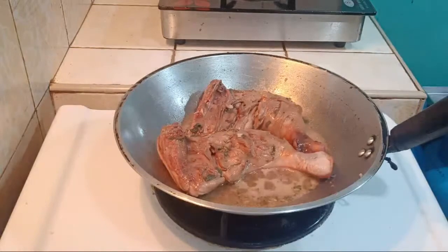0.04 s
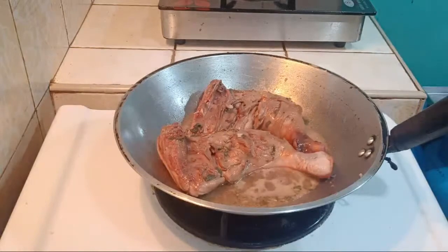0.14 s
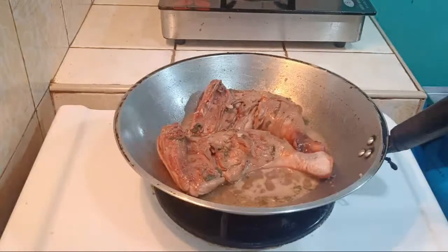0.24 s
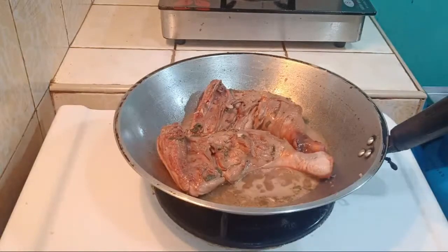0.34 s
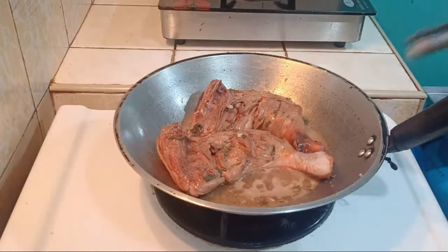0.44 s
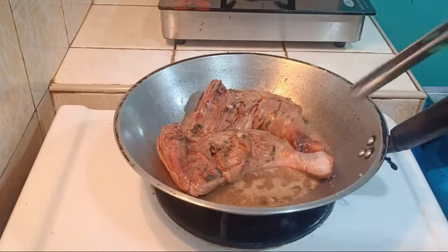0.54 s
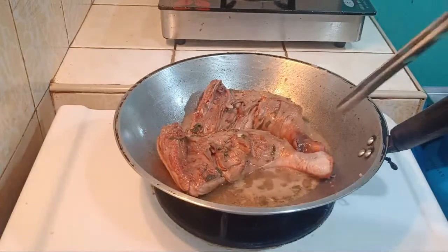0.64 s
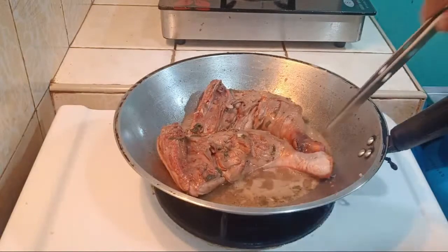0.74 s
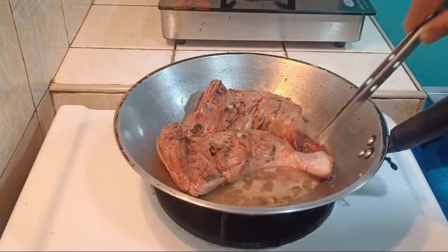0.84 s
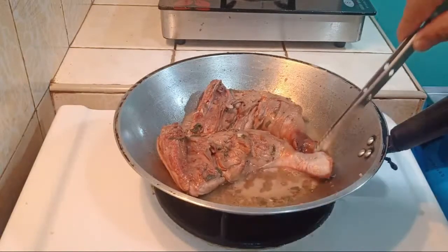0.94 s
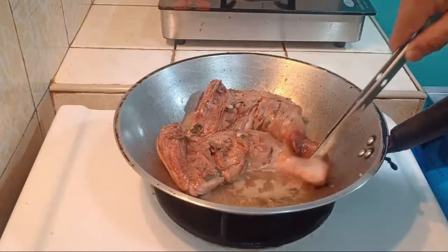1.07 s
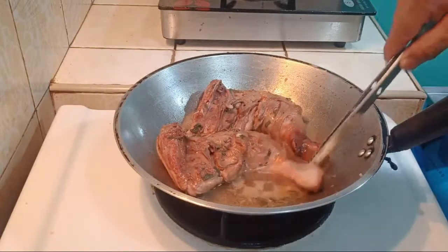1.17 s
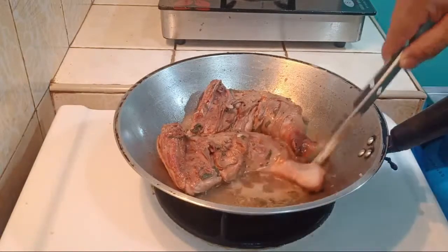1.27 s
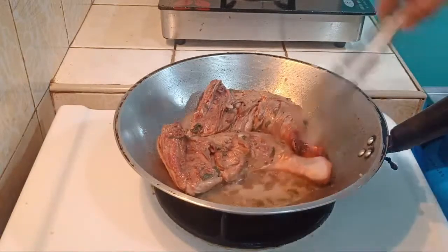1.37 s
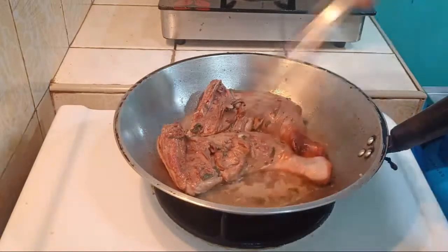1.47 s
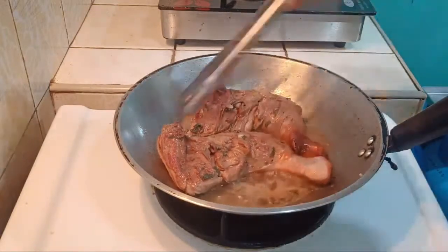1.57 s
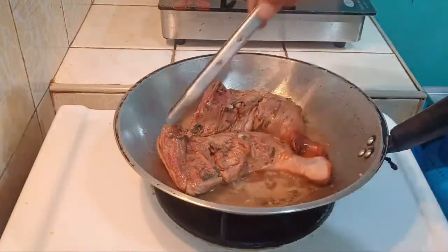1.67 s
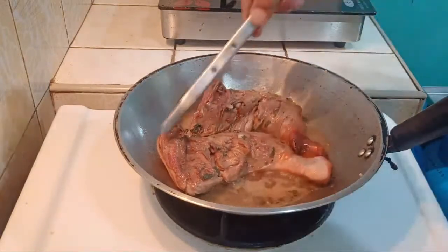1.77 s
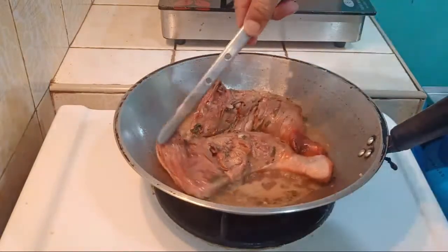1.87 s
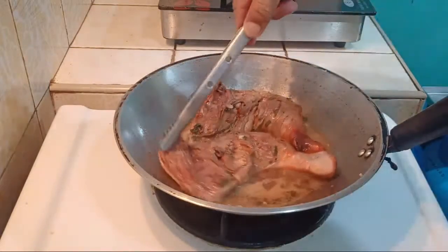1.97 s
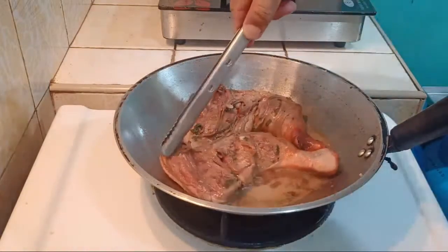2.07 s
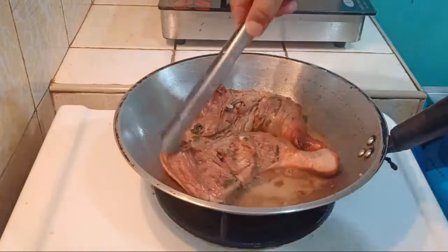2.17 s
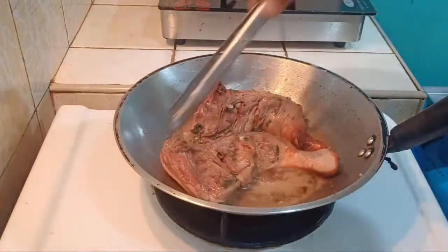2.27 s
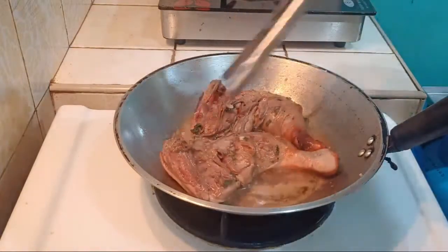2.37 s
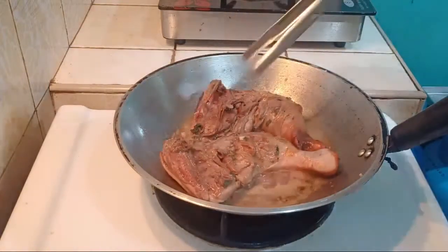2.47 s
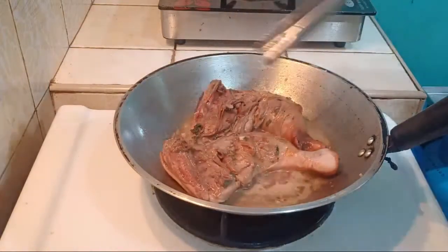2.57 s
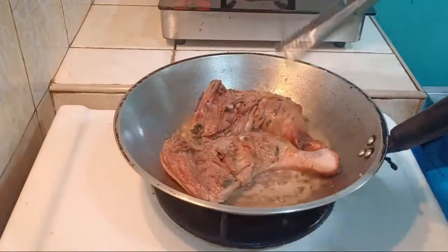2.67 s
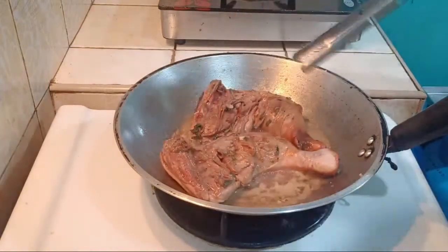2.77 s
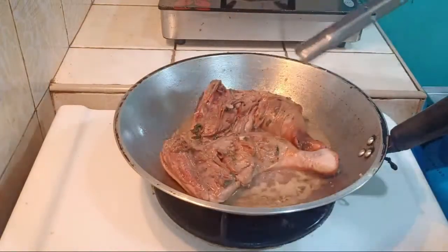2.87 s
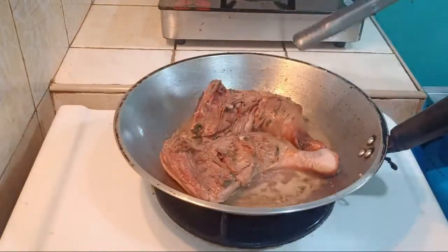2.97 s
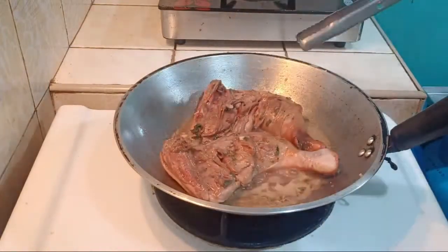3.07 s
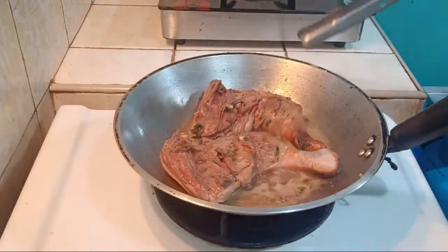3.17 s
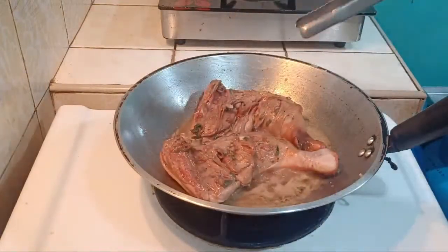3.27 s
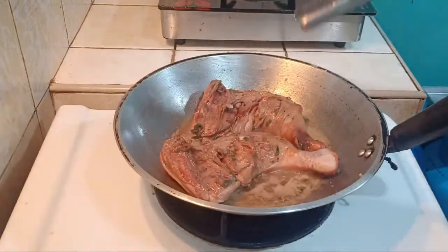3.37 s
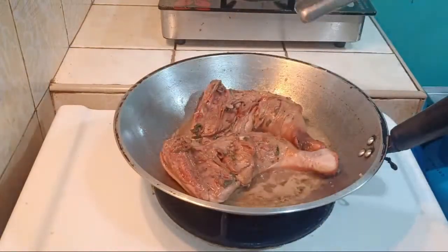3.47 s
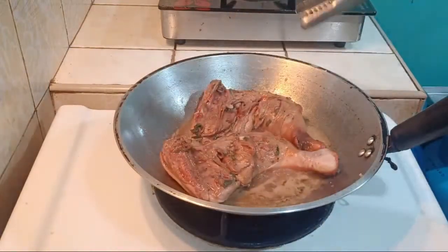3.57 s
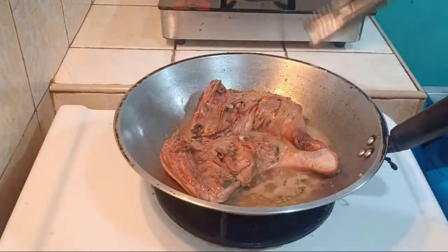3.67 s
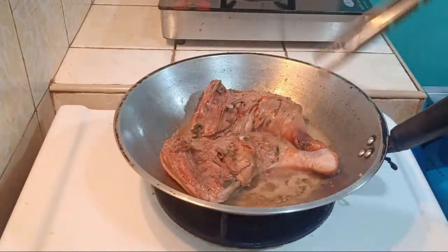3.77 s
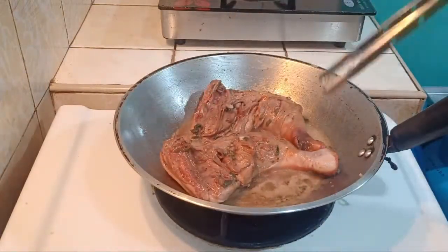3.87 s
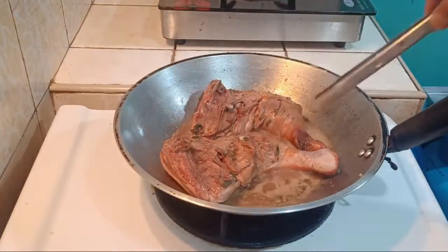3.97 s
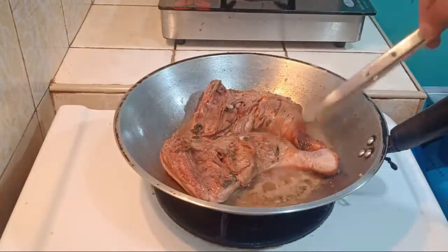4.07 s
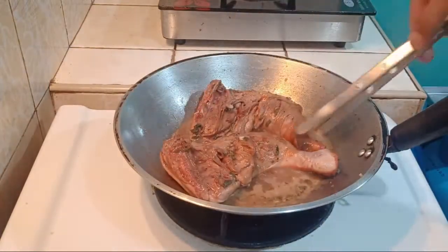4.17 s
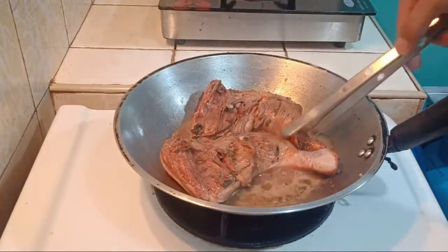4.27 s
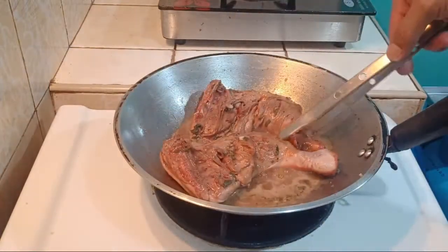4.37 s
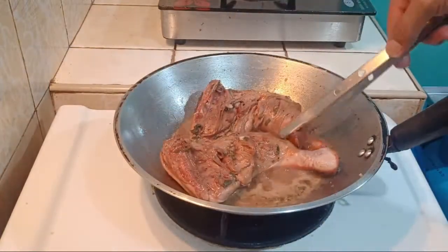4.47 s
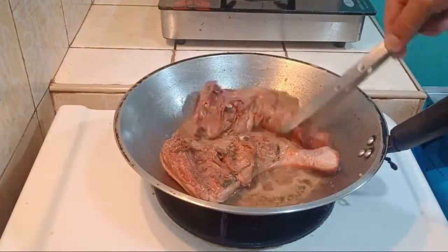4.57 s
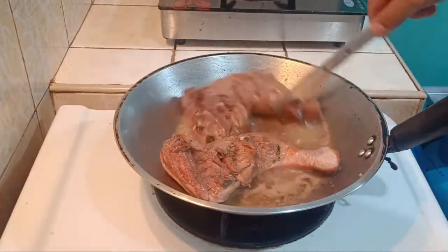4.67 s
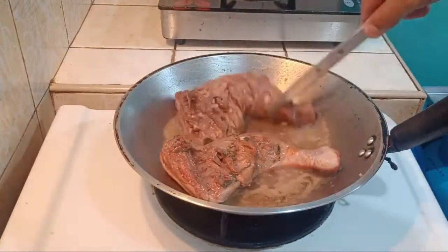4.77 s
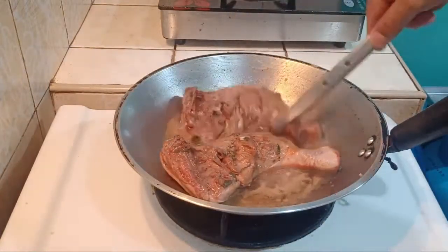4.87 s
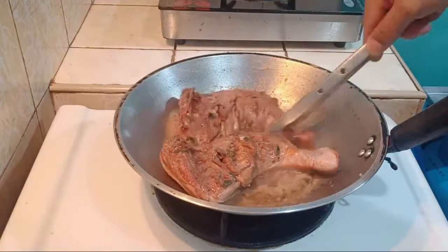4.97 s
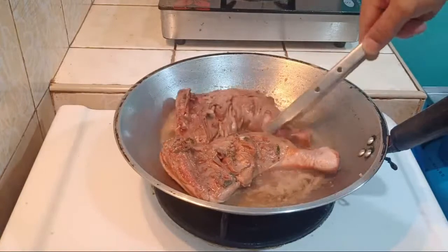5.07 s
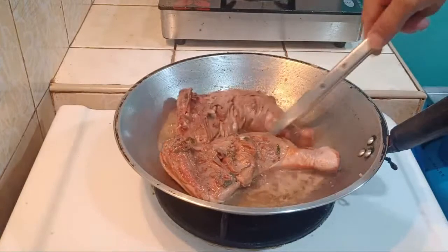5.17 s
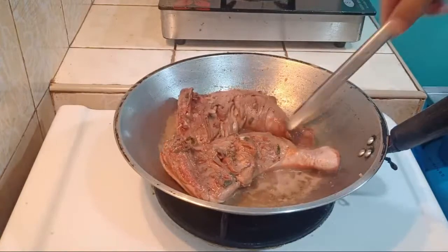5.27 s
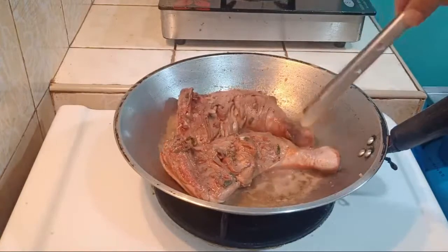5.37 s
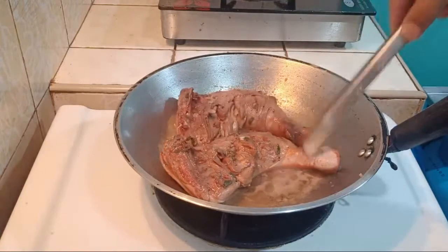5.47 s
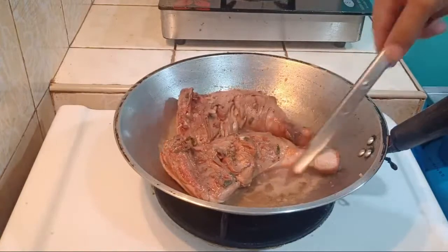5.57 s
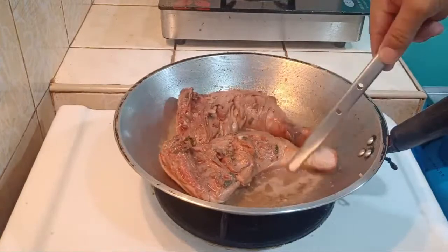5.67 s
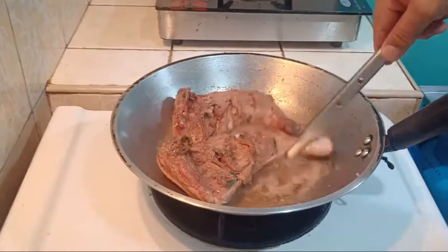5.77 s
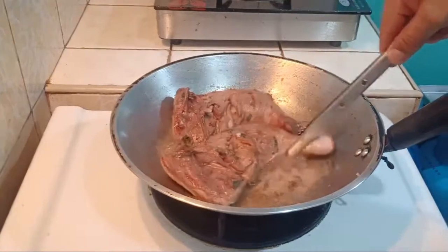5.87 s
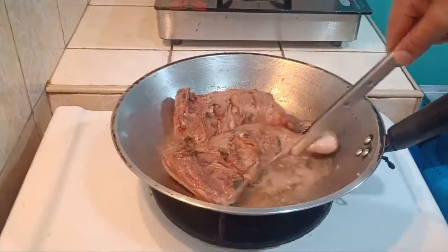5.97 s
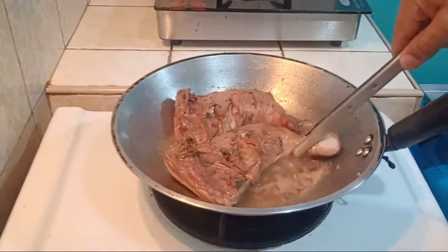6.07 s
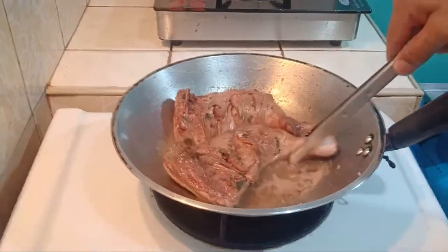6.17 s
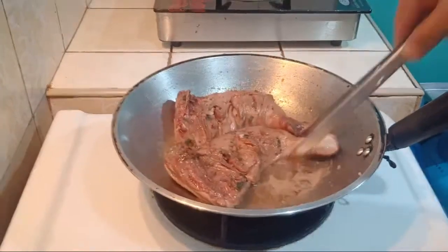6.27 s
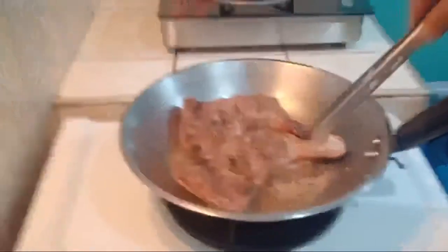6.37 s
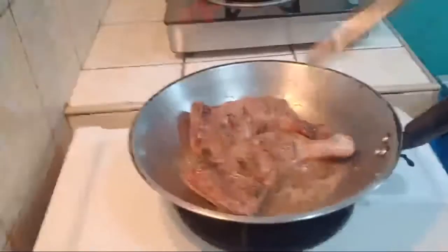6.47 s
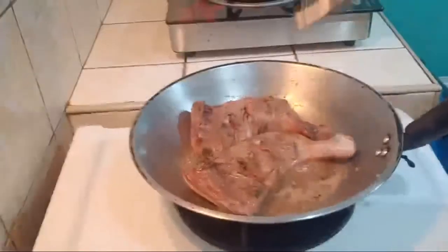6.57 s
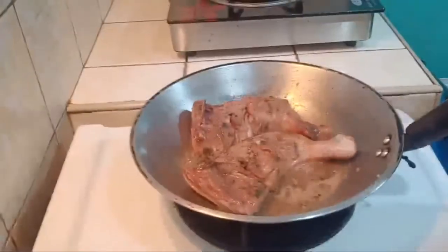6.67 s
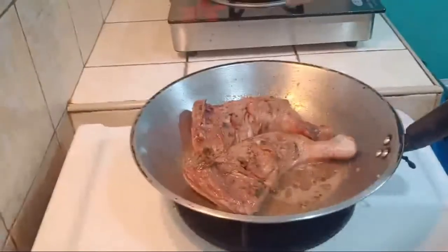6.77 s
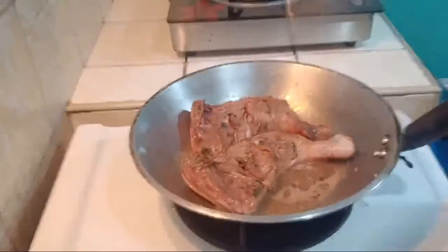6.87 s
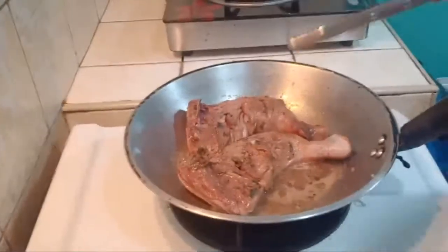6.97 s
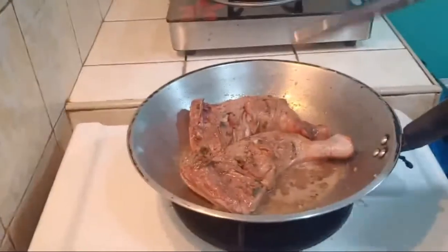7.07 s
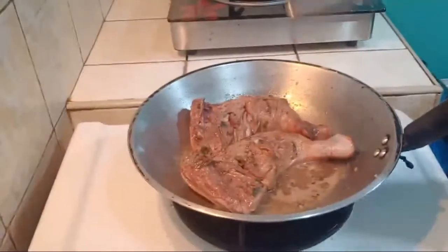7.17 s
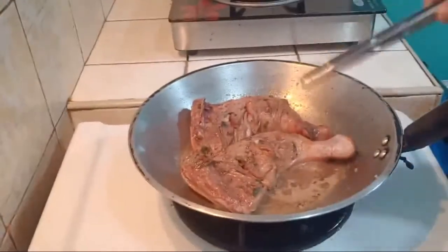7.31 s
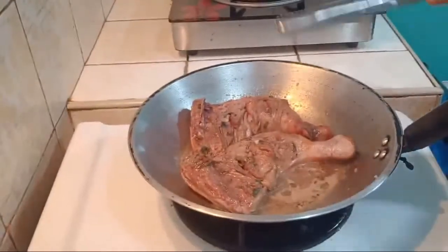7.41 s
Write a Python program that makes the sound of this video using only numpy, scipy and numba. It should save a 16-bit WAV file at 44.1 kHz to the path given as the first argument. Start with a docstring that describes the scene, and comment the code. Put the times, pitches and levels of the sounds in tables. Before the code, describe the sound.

A quiet simmer runs throughout: small bubbles blip with slightly rising pitch, froth crackles unevenly, and a burner gives soft hiss and low flutter in a small tiled kitchen with slight echo. Larger bubbles pop often in the first 1.4 seconds. Tongs tick thinly at about 0.8 s. From 1.8 to 3.2 s, tiny wavering steam squeaks slip among calmer bubbling. Tongs clink faintly near 4.0 and 4.3 s; then the broth sizzles up, strongest around 4.5 to 4.6 s with sharp pops, fading by about 5.2 s. Faint tong touches follow at 5.5 and 5.8 s. The close phone's stand is knocked loudly at 6.1 and 6.25 s, hollow and clacking, with a quick creak until 6.4 s, low wobbling, and further bumps at 6.5, 6.6 and 6.75 s. Low shaking fades by 7.0 s, where the level dips momentarily; simmering continues until 7.4 s.

```python
"""Chicken simmers in a steel wok in a tiled kitchen, heard by a phone microphone on a stand close by.
Throughout, coloured noise makes the burner's hiss and low flutter, and rising sines make bubbles over crackling froth.
Tongs ring now and then as damped modes, and steam squeaks in wavering tones; past the middle the broth
sizzles up in crackling noise when the tongs lift the meat. Near the end the stand is knocked: modes
clack dully, slips of a joint creak, low tones wobble, and then the level dips briefly."""
import sys
import numpy as np
from scipy import signal
from scipy.fft import rfft, irfft, next_fast_len
from scipy.io import wavfile
from scipy.ndimage import uniform_filter1d
from numba import njit

SR = 44100
rng = np.random.default_rng(int(sys.argv[2]) if len(sys.argv) > 2 else 0)


def master_out(mix):
    """Clip the mix to full scale and print it as 16-bit PCM to the path in sys.argv[1]."""
    frames = np.transpose(np.atleast_2d(mix))
    ceiling = np.clip(frames, -1, 1)
    pcm = np.round(ceiling * 32767).astype(np.int16)
    wavfile.write(sys.argv[1], SR, pcm)


N = 328103

# bright colour of sizzling broth, also lent to the stand's tick noise: hz [Hz], relative_level_db [dB per Hz]
SIZZLE_SPECTRUM = [(180, -40), (300, -8), (321, -6), (378, -7), (592, -3), (1070, -6), (1230, -1),
                   (1350, -5), (2710, 1), (3150, -12), (3900, -11), (4950, -7), (5500, -13.5), (6100, -8),
                   (7200, -18.5), (9550, -23.5), (15700, -19)]
# modes of the stand's hollow body: hz [Hz], relative_level_db [dB], t60_s [s]
BODY_MODES = [(634, 5, 0.023), (332, -15, 0.017), (773, 6.5, 0.0098), (985, -0.5, 0.019),
              (1160, -1, 0.0091)]


def undb(db):
    """Amplitude of a level in dB."""
    return 10 ** (np.asarray(db) / 20)


def level(x, db):
    """Scale a signal to an RMS level in dB."""
    return x * undb(db) / np.sqrt(np.mean(x ** 2))


def curve(table, off_db=-120.):
    """Columns of a table as signals; the first falls silent outside its span."""
    s, *columns = np.transpose(table)
    t = np.arange(N) / SR
    times = np.r_[s[0] - .01, s, s[-1] + .01]
    first = np.interp(t, times, np.r_[off_db, columns[0], off_db])
    return [first] + [np.interp(t, s, c) for c in columns[1:]]


def shape(table, hz):
    """Gain of a (Hz, dB) spectrum, straight on a log-frequency axis."""
    f, db = np.transpose(table)
    return undb(np.interp(np.log(hz + 1), np.log(f), db))


def colour(x, gain):
    """Filter by a gain that is a function of frequency."""
    size = next_fast_len(N)
    hz = np.arange(size // 2 + 1) * SR / size
    return irfft(rfft(x, size) * gain(hz), size)[:N]


def band(x, hz, width_hz):
    """One resonant band around a centre frequency."""
    return signal.lfilter(*signal.iirpeak(hz, hz / width_hz, SR), x)


def walk(rate_hz):
    """Random levels held 1 / rate_hz seconds and slewed twice; spread near 1."""
    hold = int(SR / rate_hz)
    steps = np.repeat(rng.standard_normal(N // hold + 1), hold)
    return 1.3 * uniform_filter1d(uniform_filter1d(steps, hold), hold)[:N]


def blows(times, db):
    """Single-sample pushes."""
    x = np.zeros(N)
    np.add.at(x, (np.asarray(times) * SR).astype(int), undb(db))
    return x


def ring(x, modes):
    """Damped modes driven by x, alternate ones in opposite sign."""
    out = 0
    for k, (hz, db, t60_s) in enumerate(modes):
        r = np.exp(-np.log(1000) / (t60_s * SR))
        w = 2 * np.pi * hz / SR
        mode = signal.lfilter([0, r * np.sin(w)], [1, -2 * r * np.cos(w), r * r], x)
        out = out + (-1) ** k * undb(db) * mode
    return out


def unit(response):
    """An object's answer to one blow, scaled to a peak of 1."""
    y = response(signal.unit_impulse(SR // 8))
    return y / np.abs(y).max()


def burst(times, db, t60_s):
    """Noise that starts at each time and dies away."""
    decay = np.exp(-np.log(1000) / (t60_s * SR))
    return signal.lfilter([1], [1, -decay], blows(times, db)) * rng.standard_normal(N)


def swells(peak_s, db, rise_s, fall_s, order=32):
    """Gain of overlapping swells, each rising to its peak and dying away exponentially."""
    column = lambda v: np.reshape(v, (-1, 1))
    t = np.arange(0, N, order) / SR - column(peak_s)
    pace = np.where(t < 0, -column(rise_s), column(fall_s))
    power = (undb(column(db)) * np.exp(-t / pace)) ** 2
    return np.sqrt(np.sum(power, axis=0)).repeat(order)[:N]


@njit
def bubbles(out, start, hz, t60, size, glide, rise, sr):
    """Each bubble is a fading sine whose pitch rises as it nears the surface."""
    for k in range(len(start)):
        n, phase = int(t60[k] * sr), 0.
        for i in range(min(n, len(out) - start[k])):
            phase += 2 * np.pi * hz[k] * (1 + glide * i / n) / sr
            fade = 1000. ** (-i / n)
            out[start[k] + i] += size[k] * np.sin(phase) * fade * min(i / (rise * n), 1.)
    return out


def simmer(count=1500, clicks=5000):
    """Froth skins burst in flickering clicks, small bubbles ring briefly, large ones pop, spray and stir froth."""
    # how lively the broth is: time_s [s], fizz_db [dB]
    liveliness = [(0.0, -57), (0.45, -57), (1.2, -59.5), (1.6, -58.5), (1.9, -57), (2.55, -58), (2.7, -55),
                  (2.95, -57), (3.4, -57), (3.8, -56.5), (4.2, -57), (4.4, -59.5), (4.6, -54.5),
                  (5.2, -59.5), (5.6, -59.5), (6.1, -56.5), (7.0, -60), (7.44, -59.5)]
    # larger bubbles: start_s [s], level_db [dB], starting pitch_hz [Hz]
    pops = [(0.3067, -42, 2300), (0.373, -46, 2670), (0.3836, -45, 2050), (0.406, -37, 2050),
            (0.4195, -36, 2260), (0.428, -35.5, 2230), (0.5297, -43, 2000), (0.5412, -40, 1970),
            (0.5911, -38, 2090), (0.638, -45, 1710), (0.643, -38, 1960), (0.7847, -38, 1790),
            (0.81, -39, 1250), (0.819, -36, 2040), (0.875, -40.5, 2050), (0.9743, -32, 1920),
            (1.089, -41, 1880), (1.132, -34.5, 1930), (1.174, -38, 1860), (1.279, -39, 2740),
            (1.305, -39.5, 2490), (1.3459, -42, 1650), (1.3746, -39, 1730), (1.399, -37, 1910),
            (1.7868, -50, 2400), (1.8911, -42, 2240), (1.938, -38, 2530), (1.971, -39, 2080),
            (2.0892, -38.5, 2340), (2.1221, -39.5, 2040), (2.374, -36, 2350), (2.415, -36.5, 2010),
            (2.51, -47, 2280), (2.7866, -40, 2020), (2.82, -34.5, 1860), (3.3854, -45, 1970),
            (3.615, -36, 1710), (3.691, -36, 2510), (3.7464, -41, 2250), (4.173, -44, 2540),
            (4.275, -36.5, 2290), (4.309, -44, 2040), (4.445, -39, 1700), (4.477, -38.5, 1740),
            (4.5047, -31.5, 2450), (4.5674, -30, 2780), (4.811, -33.5, 2310), (4.8529, -41, 1600),
            (4.8594, -43, 2580), (4.881, -33, 1660), (4.953, -38, 1700), (5.041, -41, 1750),
            (5.0505, -40, 1900), (5.251, -36, 2250), (5.4456, -41, 1660), (5.4712, -34, 2020),
            (5.625, -42.5, 1470), (5.7708, -43, 2080)]
    # colour of the crackle in the steel bowl: hz [Hz], relative_level_db [dB]
    fizz_spectrum = [(300, -50), (650, 5.5), (1100, -10.5), (1800, 1), (2600, 3.5), (3400, -15), (5000, -5),
                     (6400, -14), (7700, -23), (15500, -30), (15900, -62)]
    rise = 0.04  # share of a bubble's ring spent rising
    in_bowl = lambda x: colour(x, lambda hz: shape(fizz_spectrum, hz))

    u = rng.random((clicks, 2)).T
    click_db = np.minimum(-3.0 * np.log(1 - u[1]), 9.5)
    froth = in_bowl(burst(u[0] * N / SR, click_db, t60_s=0.0027))

    u = rng.random((count, 4)).T
    hz = 1300 * 2 ** (1.25 * np.sqrt(u[1]))
    size = undb(np.minimum(-2.5 * np.log(1 - u[2]), 6))
    t60_s = (15 + 90 * u[3] ** 2) / hz  # 15 to 105 cycles
    crowd = bubbles(np.zeros(N), (u[0] * N).astype(np.int64), hz, t60_s, size, 0.06, rise, 1. * SR)

    s, db, hz = np.transpose(pops)
    start = (s * SR).astype(np.int64)
    large = bubbles(np.zeros(N), start, hz, 11 / hz, undb(db), 0.031, rise, 1. * SR)  # 11 cycles long
    spray = burst(s, db - 11, t60_s=0.029)
    skin_snap = burst(s, db, t60_s=0.002)
    splash = in_bowl(spray + skin_snap)

    (fizz_db,) = curve(liveliness)
    # froth boils up around each large bubble
    surge = swells(s, db - 16.5, rise_s=0.0095, fall_s=0.02)
    lively = np.hypot(undb(fizz_db), surge)
    flickering_froth = undb(2.26 * walk(25)) * level(froth, -1.7)
    flickering_crowd = undb(2.2 * walk(13)) * level(crowd, -7)
    return lively * (flickering_froth + flickering_crowd) + large + splash


def squeaks():
    """Steam squeaks out from under the meat: rough wavering tones swell and fade, broken into grains."""
    # squeaks: start_s [s], level_db [dB], pitch_hz [Hz], length_s [s]
    squeak_table = [(1.769, -48.5, 2370, 0.041), (1.8, -53, 2440, 0.04), (1.923, -56, 2610, 0.033),
                    (2.15, -55, 1860, 0.056), (2.61, -52, 2830, 0.066), (2.658, -52, 2650, 0.052),
                    (2.708, -56, 2740, 0.085), (3.188, -59, 2550, 0.036), (3.77, -55, 783, 0.049),
                    (5.195, -51, 1800, 0.045)]
    out, waver, grain = np.zeros(N), walk(90), walk(450)
    for s, db, hz, length_s in squeak_table:
        i = np.arange(int(s * SR), int((s + length_s) * SR))
        swell = np.sin(np.pi * (i - i[0]) / len(i))
        # the pitch takes its roughness from a later stretch of the same walk
        pitch_hz = hz * (1 + 0.015 * waver[i] + 0.05 * grain[i + SR])
        tone = np.sin(2 * np.pi * np.cumsum(pitch_hz) / SR)
        out[i] += undb(db + 5 * grain[i]) * swell * tone
    return out


def sizzle():
    """Broth flashes to steam on hot steel in dense crackle; the treble hiss has its own swell."""
    # gushes: peak_s [s], level_db [dB], rise_s [s], fall_s [s], treble_db relative to level_db [dB]
    gushes = [(4.276, -44, 0.001, 0.046, -23), (4.5, -48, 0.029, 0.034, -24),
              (4.57, -42.5, 0.053, 0.1, -16), (4.86, -51.5, 0.15, 0.22, -19),
              (4.96, -48, 0.072, 0.061, -10)]
    s, db, rise_s, fall_s, treble_db = np.transpose(gushes)
    treble_pace = 0.76  # the treble rises and falls quicker than the crackle
    # each 48 samples of noise take a new random strength
    strength_db = 2.8 * rng.exponential(size=N // 48 + 1).repeat(48)[:N]
    crackle = rng.standard_normal(N) * undb(strength_db)
    low = colour(crackle, lambda hz: shape(SIZZLE_SPECTRUM, hz) * (hz < 7500))
    high = colour(rng.standard_normal(N),
                  lambda hz: shape(SIZZLE_SPECTRUM, hz) * (hz >= 7500) * (hz < 15800))
    low_swell = swells(s, db, rise_s, fall_s)
    high_swell = swells(s, db + treble_db, treble_pace * rise_s, treble_pace * fall_s)
    return low_swell * level(low, .1) + high_swell * level(high, .1)


def tongs():
    """A short scrape of steel on steel, a decaying noise, rings the tongs' modes."""
    # touches: start_s [s], drive_db before trim [dB], low_modes_db relative to drive_db [dB]
    clinks = [(0.839, -46, -11), (4.014, -52, 5), (4.275, -55, 15.5), (4.281, -67, 19), (5.4686, -65, 9),
              (5.7723, -66.5, 16)]
    # modes of the tongs: hz [Hz], relative_level_db [dB], t60_s [s]
    tong_modes = [(2300, 6, 0.014), (4750, 7, 0.0043), (6170, 4.5, 0.007), (8340, -6.5, 0.012),
                  (10460, -11, .015), (11250, -9, .015), (12500, -9, .012), (15200, -7, .012)]
    s, db, low_db = np.transpose(clinks)
    high = ring(burst(s, db - 18.5, t60_s=0.031), tong_modes[3:])
    low = ring(burst(s, db + low_db - 21.0, t60_s=0.041), tong_modes[:3])
    return high + low


def stand():
    """Knocks push the hollow body softly and clack sharply; the joint creaks and the legs rock."""
    # knocks: start_s [s], then drive levels body_db, upper_body_db, clack_db, ring_db, tick_db [dB]
    knocks = [(5.902, -47, -45, -58, -57, -66), (5.914, -46, -44, -61, -58, -66),
              (6.045, -45, -57, -46, -41, -48.5), (6.122, -61, -65, -40, -47, -33),
              (6.129, -14.5, -29, -24, -24, -24), (6.139, -42, -45, -47, -33.5, -44),
              (6.144, -23.5, -38, -40, -40, -39), (6.2503, -18.5, -16.5, -27.5, -15, -20),
              (6.261, -25, -23, -40, -34, -45), (6.285, -50, -48, -50, -44, -54),
              (6.35, -48, -57, -57, -48, -61), (6.383, -23.5, -22.5, -50, -40.5, -62),
              (6.478, -43.5, -52, -47, -47, -62), (6.519, -26.5, -38, -35, -35, -40),
              (6.597, -23, -41, -37.5, -43, -38.5), (6.696, -43, -52, -61, -61, -61),
              (6.751, -22, -34, -35.5, -35.5, -34.5), (6.794, -47, -52, -63, -63, -54),
              (6.834, -49, -55, -48, -61, -46.5), (7.033, -46, -58, -54, -52, -50)]
    # modes of the clack: hz [Hz], relative_level_db [dB], t60_s [s]
    clack_modes = [(1600, 1.5, 0.007), (1950, 0, 0.007), (2303, -0.5, 0.018), (2630, -5, 0.0097),
                   (2900, -9, 0.009), (3250, -3, 0.0081), (3810, -4.5, 0.021), (4750, -5, 0.012),
                   (5340, -1, 0.012), (6080, 3.5, 0.023), (7100, -11, 0.0084)]
    s, db, upper_db, clack_db, ring_db, tick_db = np.transpose(knocks)
    soft = lambda x: band(x, 660, 470)  # the springy contact that drives the body
    sharp = lambda x: band(x, 4600, 6000)
    strike = lambda x, response: signal.fftconvolve(x, unit(response))[:N]
    rattle = lambda db: blows(s, db) + burst(s, db - 14, t60_s=0.0094) + burst(s, db - 31.5, t60_s=0.098)

    late = s + 0.00093  # the body answers just after the clack
    body = strike(blows(late, db), lambda x: ring(soft(x), BODY_MODES[:2]))
    upper_body = strike(blows(late, upper_db), lambda x: ring(soft(x), BODY_MODES[2:]))
    out = body + upper_body
    for drive_db, modes in ((clack_db, clack_modes[:2]), (ring_db, clack_modes[2:5]), (tick_db, clack_modes[5:])):
        out = out + strike(rattle(drive_db), lambda x: ring(sharp(x), modes))
    tick_noise = burst(s, tick_db + 17.0, t60_s=0.0076) + burst(s, tick_db + 8.5, t60_s=0.058)
    # the tick noise fades in from 2500 to 5000 Hz
    out = out + colour(tick_noise, lambda hz: shape(SIZZLE_SPECTRUM, hz) * np.clip(hz / 2500 - 1, 0, 1))
    return out + creak() + wobble()


def creak():
    """Stick-slip: each slip, uneven in size and spacing, pushes the body; overtones sweep through its modes."""
    # slips speed up, then slow again: time_s [s], level_db [dB], slip_rate_hz [Hz]
    slip_table = [(6.268, -31, 186), (6.28, -26.5, 224.4), (6.29, -33.5, 276), (6.3, -31, 310),
                  (6.308, -29.5, 338), (6.316, -39, 367.6), (6.33, -47, 338), (6.345, -49, 290),
                  (6.355, -39.5, 223.6), (6.365, -35.5, 189), (6.374, -32.5, 166), (6.379, -47, 160)]
    db, hz = curve(slip_table)
    t = np.arange(N) / SR
    slow = (hz.min() / hz) ** 2  # slow slips are uneven, quick ones lock in
    creaking = (t > slip_table[0][0]) * (t < slip_table[-1][0])
    turns = np.cumsum(hz * creaking * (1 + .12 * slow * walk(250))) / SR
    slip_gain = undb(db + 3.5 * slow * walk(300)) * np.sqrt(SR / hz)  # even power at any slip rate
    slips = np.diff(np.floor(turns), prepend=0) * slip_gain
    grit = slow * undb(db - 6 + 3 * walk(200)) * level(band(rng.standard_normal(N), 900, 600), 0)
    push = unit(lambda x: band(ring(x, BODY_MODES) + undb(16) * band(x, 750, 450), 680, 550))
    return signal.fftconvolve(slips, push / np.linalg.norm(push))[:N] + grit


def wobble():
    """The stand rocks: a low wavering tone with its octave, over rumbling noise."""
    # two spells of rocking, each: time_s [s], level_db [dB], rumble_db relative to level_db [dB], pitch_hz [Hz]
    rocking = [
        [(6.25, -60, 14, 125), (6.288, -37.5, -6, 108), (6.31, -41, -5, 103), (6.336, -50.5, 0, 105),
         (6.376, -57.5, 11, 109), (6.432, -44, -16, 102.3), (6.46, -52, -18, 104), (6.474, -54, -13, 102.3),
         (6.52, -63, 13, 107)],
        [(6.797, -50, 5, 150), (6.818, -44.5, -4.5, 108), (6.84, -42, -9, 106), (6.862, -47, -6, 104),
         (6.895, -38.5, -16.5, 97), (6.934, -60, -20, 93.7), (6.965, -46, -11, 100), (7.0, -76, -18, 98)],
    ]
    waver_hz, octave_db = 2.57, -16
    out = 0
    for table in rocking:
        db, rumble_db, hz = curve(table)
        turn = 2 * np.pi * np.cumsum(hz + waver_hz * walk(30)) / SR
        tone = undb(0.99 * walk(60)) * np.sin(turn)
        octave = undb(octave_db + 3.2 * walk(40)) * np.cos(2 * turn)
        rumble = band(band(rng.standard_normal(N), 180, 330), 180, 330)
        out = out + undb(db) * (level(tone + octave, .1) + undb(rumble_db) * level(rumble, .1))
    return out


def kitchen():
    """Burner and kitchen: noise in overlapping bands that swell together and flicker alone."""
    # spectrum of the steady noise: hz [Hz], relative_level_db [dB per Hz]
    noise_spectrum = [(30, 2), (62, -22.5), (78, -12.5), (98, -3.5), (125, -7), (280, -12), (640, -12),
                      (1030, -16.5), (2300, -14.5), (3500, -25), (5000, -21.5), (6300, -25.5), (7700, -38),
                      (10600, -40.5), (12200, -32.5), (15500, -33), (15900, -57)]
    out, swell = 0, walk(1.88)
    for centre in np.arange(5, 14.5, .75):  # octaves above 1 Hz
        overlap = lambda hz: np.sqrt(np.clip(1 - abs(np.log2(hz + 1) - centre) / .75, 0, 1))
        part = colour(rng.standard_normal(N), lambda hz: shape(noise_spectrum, hz) * overlap(hz))
        out = out + part * undb(0.32 * swell + 1.22 * walk(8.4))
    return level(out, -53.5)


def flutter():
    """The burner's low flutter: a narrow band of noise that drifts in strength and pitch."""
    # drift of the flutter: time_s [s], level_db [dB], centre_hz [Hz]
    drift = [(0.0, -63.5, 106), (0.9, -66.5, 102), (1.1, -65, 137), (2.1, -68, 130), (2.7, -60, 140),
             (3.55, -67.5, 138), (3.75, -72, 112), (4.25, -64.5, 114), (4.45, -66, 100), (5.3, -64, 106),
             (5.8, -67, 110), (6.1, -56.5, 102), (7.15, -59, 96), (7.44, -68, 100)]
    db, hz = curve(drift)
    slow = rng.standard_normal((2, N))
    for _ in range(2):
        slow = uniform_filter1d(slow, SR // 21, axis=1)
    turn = 2 * np.pi * np.cumsum(hz) / SR
    noise_band = slow[0] * np.cos(turn) + slow[1] * np.sin(turn)
    return undb(db - 0.1 * walk(4.8)) * level(noise_band, 0.38)


def tiled_room(near):
    """Tiles echo the close sounds as a decaying noise tail, starting 3 ms late."""
    t60_s, tail_db = 0.47, -20.5
    t = np.arange(SR // 4) / SR
    tail = undb(tail_db - 60 * t / t60_s) * rng.standard_normal(len(t)) * (t > .003)
    tail = tail / np.sqrt(t60_s * SR / 14)  # near unit energy before tail_db
    return signal.fftconvolve(near, tail)[:N]


def scene():
    """Close sounds with their echo over the burner; the whole level dips briefly near the end."""
    near = simmer() + squeaks() + sizzle() + tongs() + stand()
    dip_s, dip_length_s, dip_db = 7.004, 0.011, -12
    dip = undb(dip_db * np.exp(-((np.arange(N) / SR - dip_s) / dip_length_s) ** 2))
    return (dip * (near + tiled_room(near) + kitchen() + flutter()))[None]


def record(dry):
    """The deepest bass is thinned and the top ends steeply above 16 kHz."""
    bass_cut = signal.butter(4, 62, "high", fs=SR, output="sos")
    top_cut = signal.ellip(10, .2, 80, 16350, fs=SR, output="sos")
    return signal.sosfilt(top_cut, signal.sosfilt(bass_cut, dry))


dry = scene()
out = record(dry)
master_out(out)
```